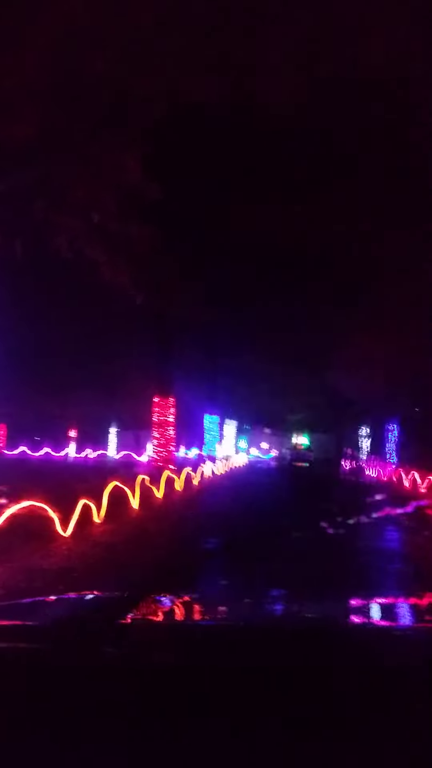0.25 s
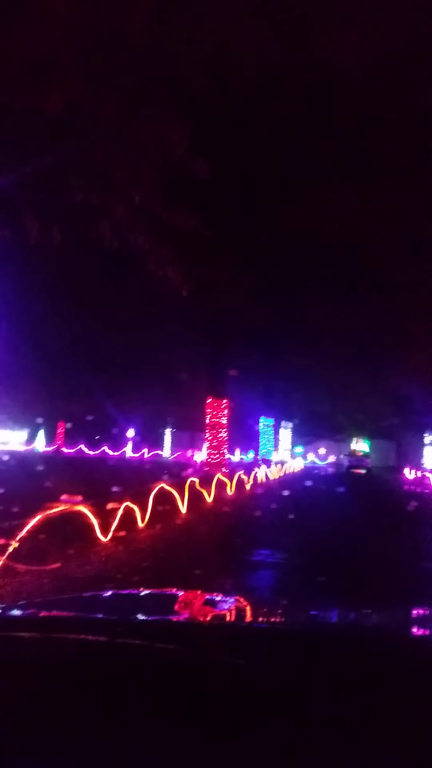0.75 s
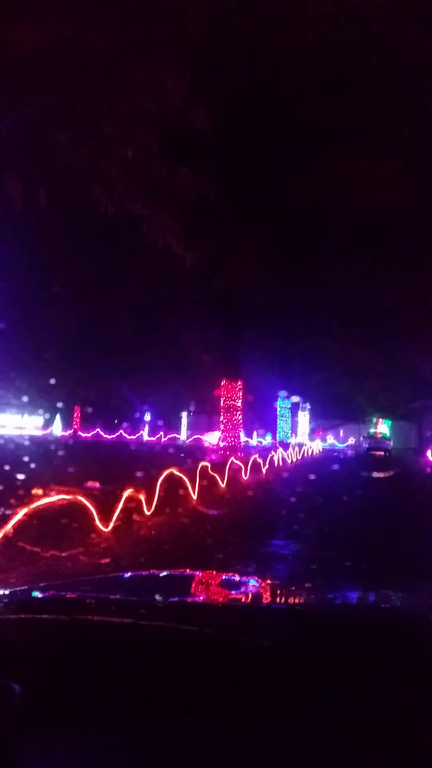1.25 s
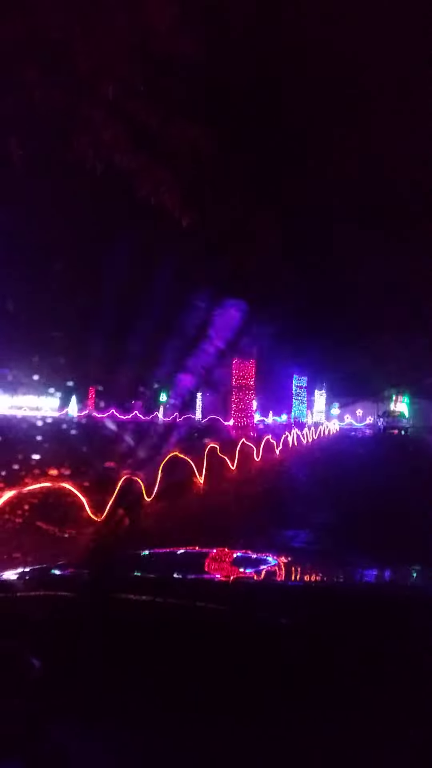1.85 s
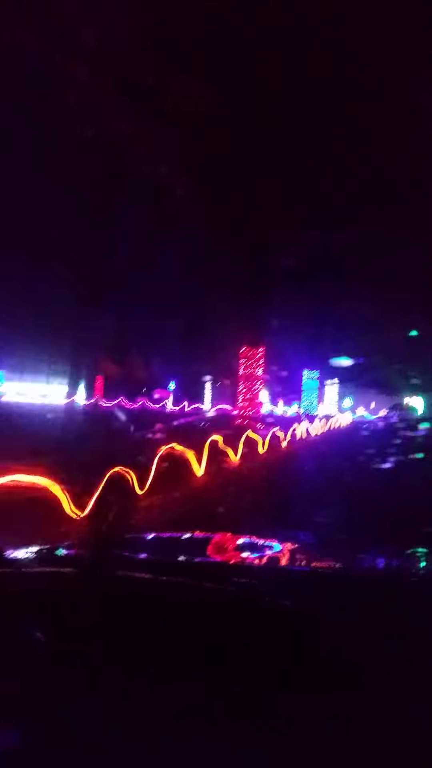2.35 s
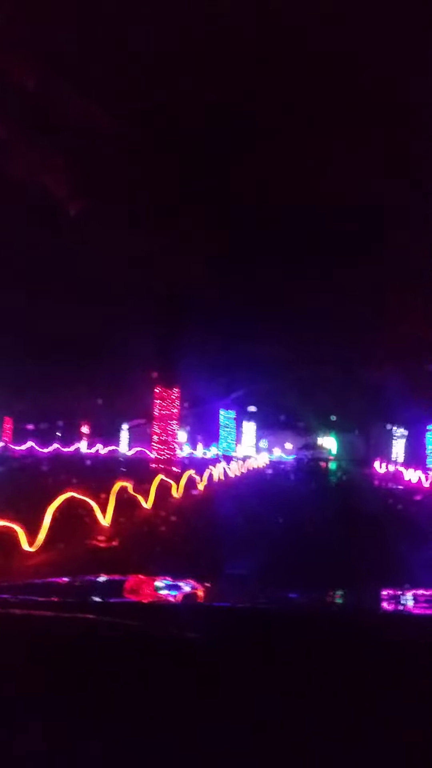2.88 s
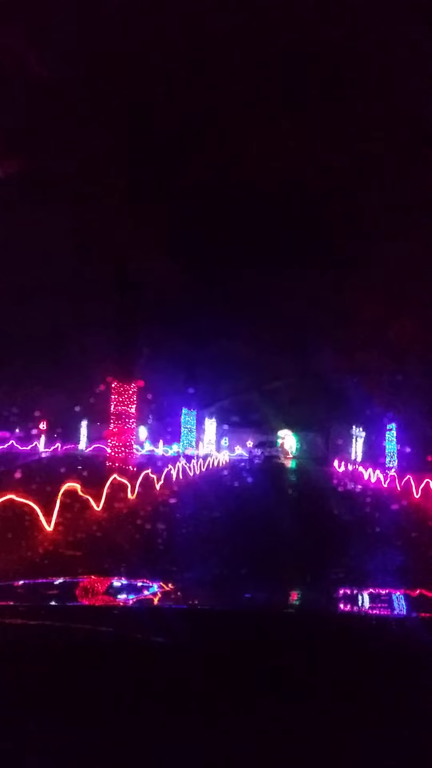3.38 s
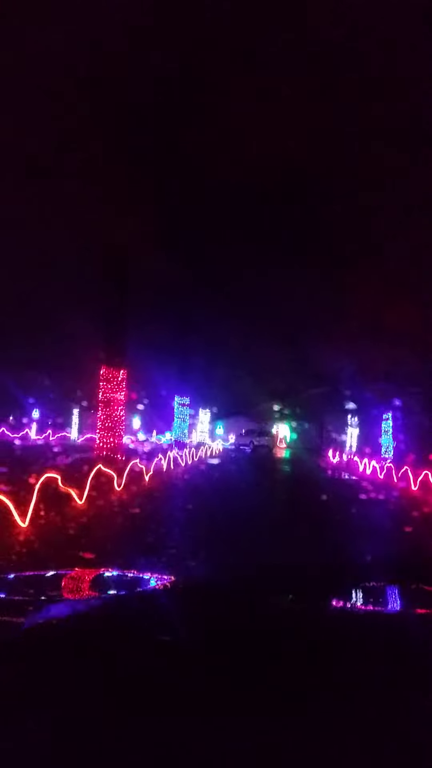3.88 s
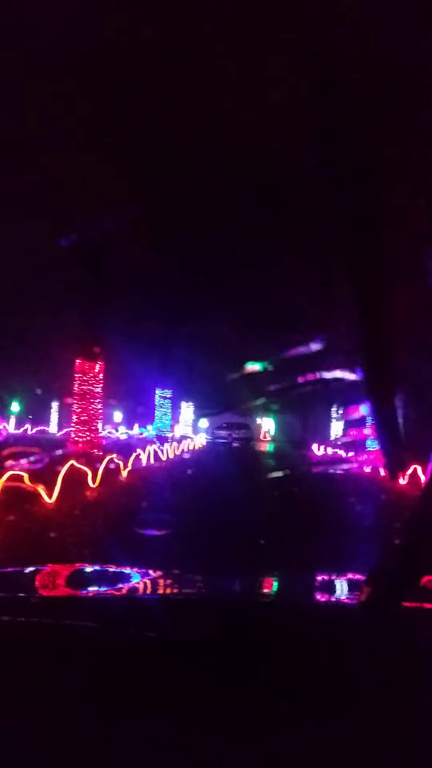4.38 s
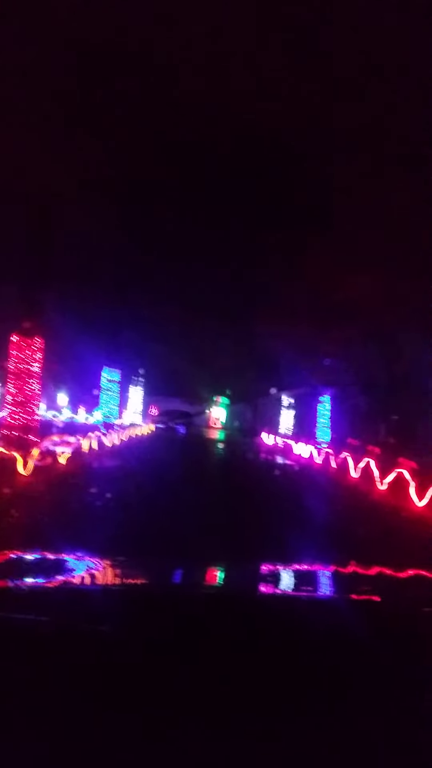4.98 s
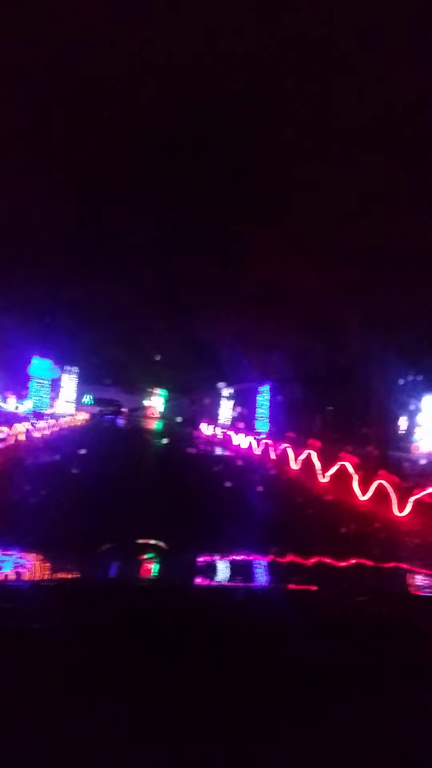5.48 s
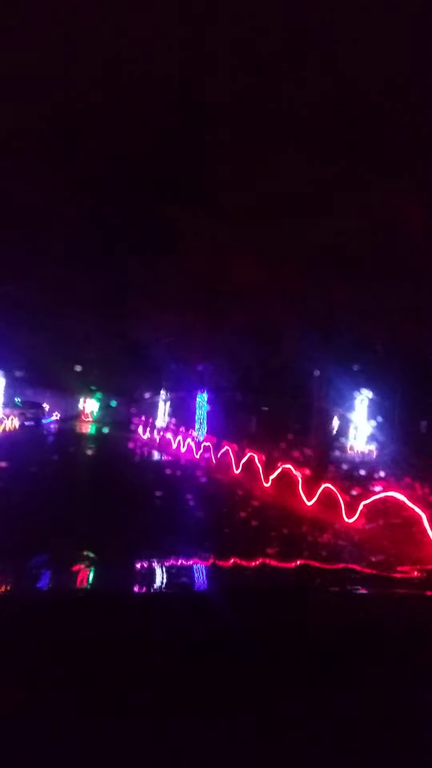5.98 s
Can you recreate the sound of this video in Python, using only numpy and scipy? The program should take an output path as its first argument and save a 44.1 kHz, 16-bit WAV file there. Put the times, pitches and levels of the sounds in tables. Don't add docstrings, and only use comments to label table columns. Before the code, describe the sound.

From the seat of a slowly moving car, dense fine rain patters while heavier drops knock overhead and splat on glass, in clusters with short gaps. Wipers thump softly around one and a half, two and four seconds, and a low road bump rolls by before four. An especially hard smack lands at about 3.4 seconds, with another near 4.6. Just after six seconds wet rubber squeaks upward. The sound is close, dry and slightly muffled on top.

```python
import sys
import numpy as np
from scipy import signal
from scipy.fft import rfft, irfft
from scipy.io import wavfile
from scipy.ndimage import uniform_filter1d

SR = 44100
rng = np.random.default_rng(int(sys.argv[2]) if len(sys.argv) > 2 else 0)


def gain_from_db(level_db):
    decades = np.asarray(level_db, float) / 20
    return 10 ** decades


def master(y):
    cut = np.clip(np.atleast_2d(y).T, -1, 1)
    pcm = np.round(cut * 32767)
    wavfile.write(sys.argv[1], SR, pcm.astype(np.int16))


N = 274743


def evened(x):
    return x / np.sqrt(np.mean(x ** 2, -1, keepdims=True) + 1e-20)


def read(points, hz):
    f, value = np.transpose(points)
    return np.interp(np.log(np.minimum(hz, 14800) + 1), np.log(f + 1), value)


def add(mix, start_s, sound):
    part = mix[max(round(start_s * SR), 0):][:len(sound)]
    part += sound[:len(part)]


def coloured(points, x):
    gain = gain_from_db(read(points, np.fft.rfftfreq(x.shape[-1], 1 / SR)))
    return evened(irfft(rfft(x) * gain, x.shape[-1]))


# pitch_hz, t60_s, rise_factor
PANEL_BANDS = [(150, 0.38, 5.5), (300, 0.22, 4.45), (487, 0.24, 1.23), (1106, 0.14, 1.35),
               (1950, 0.12, 0.81), (4100, 0.099, 0.9), (6300, 0.13, 0.19), (12100, 0.14, 0.11)]
# pitch_hz, level_db (per Hz)
PANEL_COLOUR = [(35, -66), (60, -94), (119, -22.5), (252, -1.5), (341, -4), (384, 1), (600, -8), (796, -4),
                (983, -9), (1940, -2.5), (2580, -11.5), (4750, -22), (6910, -36.5), (15000, -43),
                (16500, -89)]
# pitch_hz, level_db, t60_s
ROOF_MODES = [(436.4, -7, 0.2), (344, -18.5, 0.089), (757.4, -13.5, 0.25), (1113, -11.5, 0.14),
              (1400, -7.5, 0.074), (1780, -21, 0.046), (2225, -7, 0.1), (4906, -14.5, 0.033)]
LUMP_DB, BURST, BURST_S = 3, 0.72, .0025
DRY_DB = -8


def knocks(boom_db, splat_db, ring, rise_ms, size=4096):
    t, hz = np.arange(size) / SR, np.fft.rfftfreq(size, 1 / SR)
    boom_db, splat_db, ring, rise_ms = (np.asarray(c)[:, None] for c in (boom_db, splat_db, ring, rise_ms))
    ring = np.clip(ring, .2, 2.5)
    rise_s = np.clip(rise_ms, .05, 25) / 1000

    chance = rng.standard_normal((len(ring), size + 2 * len(ROOF_MODES)))
    dense = rfft(chance[:, :size]) * gain_from_db(read(PANEL_COLOUR, hz))
    dense /= np.sqrt(np.mean(abs(dense) ** 2) / size)
    lumps = evened(uniform_filter1d(chance[::-1, :size], size=25, axis=1))
    splash = gain_from_db(LUMP_DB * lumps) * (1 + BURST * np.exp(-t / (BURST_S + rise_s)))

    def tilt(f):
        boom = (boom_db + 0.5) * np.interp(f, [600, 1100], [1, 0])
        splat = (splat_db + 21.5) * np.interp(f, [3000, 6000], [0, 1])
        return gain_from_db(boom + splat + DRY_DB * np.interp(f, [5000, 9000], [0, 1]))

    out = np.zeros((len(ring), size))
    centres = [row[0] for row in PANEL_BANDS]
    for k, (f, t60_s, slow) in enumerate(PANEL_BANDS):
        share = read(list(zip(centres, np.arange(len(PANEL_BANDS)) == k)), hz)
        wet = splash ** np.interp(f, [1000, 12000], [.3, 1])
        swell = (1 - np.exp(-t / (rise_s * slow))) ** 1.23
        out += wet * tilt(f) * irfft(dense * share, size) * swell * gain_from_db(-60 * t / (t60_s * ring))
    for k, (f, level_db, t60_s) in enumerate(ROOF_MODES):
        reach = np.tanh(chance[:, [size + 2 * k]])
        detune = 1 + 0.017 * chance[:, [size + 2 * k + 1]]
        envelope = gain_from_db(level_db - 60 * t / (t60_s * ring)) * (1 - np.exp(-t / (rise_s * 0.24)))
        out += tilt(f) * reach * envelope * np.sin(2 * np.pi * f * detune * t)
    out *= np.clip(4 - 4 * np.arange(size) / size, 0, 1)
    mid = signal.sosfilt(signal.butter(2, [900, 4000], "band", fs=SR, output="sos"), out)
    return out / abs(mid).max(1, keepdims=True)


PATTER_PER_S = 220


def patter(count=60):
    boom, splat, ring, rise = rng.standard_normal((count, 4)).T
    shapes = knocks(-5 + 2 * boom, -16 + 3 * splat, .5 + .12 * ring, .8 * np.exp(.8 * rise))
    out = np.zeros(N)
    for at, spot, size in rng.random((1500, 3))[:int(PATTER_PER_S * N / SR)]:
        level_db = -2.6 * np.log(1 - .97 * size)
        add(out, at * N / SR, gain_from_db(level_db) * shapes[int(spot * count)])
    return evened(out)


# pitch_hz, level_db (per Hz)
WASH_COLOUR = [(18, -73), (30, -45), (255, 8), (432, 3), (592, -1.5), (813, 2), (978, -5.5), (2000, -3.5),
               (3380, -18), (4900, -23.5), (6900, -46), (14800, -28), (16500, -104)]
# start_s, level_db
RAIN_LEVEL = [
    (0.0, -38.5),
    (1.32, -42.5),
    (1.54, -38.5),
    (3.5, -47.5),
    (3.57, -46.5),
    (4.94, -40.5),
    (5.24, -46),
    (6.23, -39.5),
]
PATTER_DB = -1


def rain():
    frames, hz = N // 128 + 5, np.fft.rfftfreq(512, 1 / SR)
    a, b, patches = rng.standard_normal((frames, 257, 3)).T
    patches = uniform_filter1d(patches, size=8, axis=0)
    patches = evened(uniform_filter1d(patches, size=10, axis=1))
    flicker = evened(uniform_filter1d(rng.standard_normal(frames), size=5))
    patch_db = 4.54 * patches * np.interp(hz, [400, 1000], [.6, 1])[:, None]
    flicker_db = 3.3 * flicker * np.interp(hz, [400, 1000, 5000, 7500], [.65, 0.93, 1, .3])[:, None]
    z = (a + 1j * b) * gain_from_db(patch_db + flicker_db)
    wash = coloured(WASH_COLOUR, signal.istft(z, nperseg=512, noverlap=384)[1][:N])
    start_s, level_db = np.transpose(RAIN_LEVEL)
    swell = gain_from_db(np.interp(np.arange(N) / SR, start_s, level_db) - 6.0)
    return swell * (wash + gain_from_db(PATTER_DB) * patter())


# start_s, level_db, pitch_hz, t60_s
BUMPS = [
    (.002, -57, 106, 0.14),
    (2.03, -60, 120, .15),
    (2.4, -62, 99, 0.18),
    (2.785, -53, 121, 0.13),
    (3.72, -48, 105, .5),
    (3.851, -59, 95, .3),
    (4.321, -55, 130, 0.18),
    (5.01, -62, 111, .15),
]
# start_s, level_db, pitch_hz, t60_s
PANEL_PINGS = [(.055, -28, 700, .09), (3.93, -42, 4750, .06), (3.841, -48, 4750, .06),
               (3.709, -49, 4750, .05), (1.408, -39, 660, .12), (1.456, -34, 750, .12),
               (2.126, -35, 420, .07), (2.555, -41, 3350, .035), (3.228, -50, 3500, .04),
               (3.655, -38, 410, .14), (5.399, -39, 1600, .07), (5.863, -36, 420, .1),
               (5.954, -34, 420, .1)]
# start_s, level_db, pitch_hz, t60_s
WIPER_THUMPS = [(1.535, -33, 228.6, 0.24), (1.54, -38.5, 388, 0.25), (1.63, -41, 206, 0.54),
                (1.7, -44.5, 150, 0.24), (1.962, -25, 256, 0.03), (2.188, -34, 197, 0.081),
                (3.718, -44, 134, 0.42), (3.74, -37.5, 257, 0.27), (3.765, -36.5, 381, 0.28),
                (4.169, -34, 218, 0.1), (4.422, -31.5, 235, 0.069), (5.916, -45.5, 126, 0.79),
                (5.94, -43.5, 236.5, 0.32), (6.129, -50, 111, .4), (6.199, -58, 197, 0.55)]


def thumps():
    out, t = np.zeros(N), np.arange(SR // 2) / SR
    rows = WIPER_THUMPS + PANEL_PINGS + BUMPS
    for (start_s, level_db, hz, t60_s), noise in zip(rows, rng.standard_normal((len(rows), len(t)))):
        wobble = evened(uniform_filter1d(noise, size=500))
        ring = (1 + .4 * wobble) * np.sin(2 * np.pi * hz * t + .7 * wobble)
        onset = 1 - np.exp(-t * hz / 0.46)
        add(out, start_s, gain_from_db(level_db + 4.0 - 60 * t / t60_s) * onset * ring)
    return out


# start_s, level_db (peak)
TICKS_MIDDLE = [(.0548, -22), (.4861, -25), (.5519, -13.5), (.5893, -23), (.759, -31), (.8229, -15),
                (.9868, -19), (.4395, -28), (.3165, -20), (.9305, -22), (.8624, -25), (1.892, -22),
                (2.2872, -26.5), (2.4896, -22), (2.6418, -36), (2.828, -30), (2.8948, -16.5),
                (3.1871, -26.5), (3.4091, -18), (3.46, -31), (3.7336, -25), (3.7611, -23), (4.6005, -22),
                (4.3985, -29), (4.4293, -16), (4.662, -20), (4.7781, -21), (4.9673, -12), (5.3991, -20),
                (5.4355, -21.5), (5.5846, -28.5), (6.1051, -12)]
# start_s, level_db (peak)
TICKS_SIDE = [(.0894, -29), (.2834, -27.5), (.9892, -40), (1.441, -30), (1.6326, -22), (1.8555, -35),
              (4.1385, -25), (4.4697, -33), (4.8408, -38), (6.0193, -29), (6.142, -29), (6.169, -43),
              (1.829, -38), (4.677, -33), (6.006, -35), (6.03, -40), (.67, -31), (2.752, -40), (4.116, -34),
              (2.733, -39), (4.0667, -42), (4.1711, -36)]
# start_s, level_db (peak)
TICKS_RIM = [(.1583, -17), (.5009, -23.5), (.5807, -25), (1.0044, -35), (1.458, -23), (1.5584, -26),
             (2.0602, -37), (2.9414, -19.5), (3.4966, -28), (3.8401, -36), (3.9284, -21), (4.0894, -17),
             (4.5135, -21), (4.6284, -20.5), (4.7914, -32), (4.9154, -22.5), (5.2696, -33), (5.2861, -28.5),
             (5.5542, -34), (5.6398, -20.5), (5.24, -28), (5.32, -39), (5.979, -30), (1.167, -33.5),
             (1.545, -32), (5.901, -37), (5.806, -31), (3.187, -33)]
MIDDLE_HZ, SIDE_HZ, RIM_HZ = 1760, 3700, 4520
MIDDLE_SNAP, SIDE_SNAP, RIM_SNAP, STRAY_SNAP = 0.5, 1, 0.67, 0.59
STRAY_PER_S, STRAY_DB = 140, -46.5


def ticks():
    spots = [(TICKS_MIDDLE, MIDDLE_HZ, MIDDLE_SNAP), (TICKS_SIDE, SIDE_HZ, SIDE_SNAP),
             (TICKS_RIM, RIM_HZ, RIM_SNAP)]
    rows = [(start_s, level_db, hz, snap) for table, hz, snap in spots for start_s, level_db in table]
    for at, size, pitch in rng.random((900, 3))[:int(STRAY_PER_S * N / SR)]:
        stray_db = STRAY_DB - 1.2 * np.log(1 - .97 * size)
        rows.append((at * N / SR, stray_db, 1600 + 4200 * pitch, STRAY_SNAP))

    t, out = np.arange(700) / SR, np.zeros(N)
    for (start_s, level_db, hz, snap), noise in zip(rows, rng.standard_normal((1000, len(t)))):
        click = np.sin(2 * np.pi * hz * t) * gain_from_db(-10 * hz * t) * (1 - np.exp(-t * hz * 5))
        click[2:4] += 0.14 * snap, -.3 * snap
        fade = gain_from_db(-60 * t / 0.052) * (1 - t / t[-1])
        reflections = uniform_filter1d(noise, size=4) * 0.24 * snap * fade
        add(out, start_s, gain_from_db(level_db + 2.5) * np.convolve(click + reflections, [.3, .6, .3]))
    return out


# start_s, level_db (peak)
SPRAY_BURSTS = [(0.0318, -47), (0.156, -31), (0.2079, -49), (0.3157, -40), (0.3586, -45), (0.4389, -46),
                (0.4783, -50), (0.4998, -45), (0.5272, -50), (0.5496, -32), (0.5881, -56), (0.5881, -45),
                (0.6235, -45), (0.6953, -51), (0.7642, -35), (0.822, -55), (0.8614, -55), (0.8804, -48),
                (0.93, -35), (0.9697, -54), (0.9862, -43), (1.1648, -50), (1.2176, -52), (1.4037, -46),
                (1.4042, -41), (1.4401, -51), (1.4551, -37), (1.5414, -52), (1.5574, -43), (1.5973, -52),
                (1.6307, -50), (1.7439, -42), (1.8282, -51), (1.891, -40), (1.953, -43), (2.0133, -48),
                (2.0582, -33), (2.0832, -36), (2.1016, -30.5), (2.177, -45), (2.2174, -45), (2.2857, -49),
                (2.4872, -33), (2.5545, -33.5), (2.602, -46), (2.6988, -40), (2.7985, -47), (2.8265, -49),
                (2.8454, -48), (2.8804, -46), (2.8943, -40), (2.9402, -36),
                (3.1417, -51), (3.1856, -49), (3.2086, -54), (3.2211, -49), (3.2844, -53), (3.3617, -30),
             (3.4076, -40), (3.4575, -47), (3.4964, -36), (3.6571, -49), (3.7055, -36), (3.7324, -47),
             (3.8257, -51), (3.8392, -44), (3.9274, -34), (3.9664, -51), (4.0856, -38), (4.1115, -41),
                (4.1373, -41), (4.1787, -50), (4.3493, -56), (4.3977, -53), (4.4285, -35), (4.4691, -44),
              (4.5115, -45), (4.512, -39), (4.5988, -44), (4.6277, -44), (4.6462, -52), (4.6611, -44),
              (4.6846, -42), (4.7015, -42), (4.7379, -46), (4.7769, -49), (4.8008, -47), (4.8397, -47),
              (4.8811, -47), (4.9145, -43), (4.9689, -43), (5.0088, -50), (5.0547, -47), (5.1086, -50),
              (5.136, -42), (5.2667, -48), (5.3984, -43), (5.4344, -43), (5.4678, -43), (5.5022, -40),
              (5.5835, -50), (5.6389, -40), (5.7347, -41), (5.7731, -47), (5.8604, -52), (5.9183, -38),
              (6.0579, -45),
                (1.035, -49),
    (2.33, -50),
    (2.731, -50),
    (3.511, -39),
    (3.67, -46),
    (4.112, -42),
    (4.126, -46),
    (4.72, -45),
    (4.751, -51),
    (6.2135, -40),
]
SPRAY_HZ, SPRAY_DB, SPRAY_T60_S = 5200, -5, 0.048


def spray():
    start_s, level_db = np.transpose(SPRAY_BURSTS)
    t, out = np.arange(1500) / SR, np.zeros(N)
    noise = rng.standard_normal((len(start_s), 2, len(t)))
    highpass = signal.butter(3, SPRAY_HZ, "high", fs=SR, output="sos")
    hiss = evened(signal.sosfilt(highpass, noise[:, 0]))
    lumps = evened(uniform_filter1d(noise[:, 1], size=30))
    crack = 1 + 1.96 * np.exp(-t / .0009)
    shape = crack * (1 - np.exp(-t / 0.00019)) * (1 - t / t[-1])
    gain = gain_from_db(level_db[:, None] + SPRAY_DB - 6.5 + 3.8 * lumps - 60 * t / SPRAY_T60_S)
    for at, burst in zip(start_s, gain * shape * hiss):
        add(out, at, burst)
    return out


# start_s, level_db (peak), ring_factor, boom_db
ON_SIDE = [
    (.0313, -35, 0.77, -6),
    (.2803, -42, 0.45, -1.1),
    (.4375, -35, .47, -5),
    (2.5535, -27.5, 0.47, -0.5),
    (4.6835, -24, 0.26, -3),
    (4.9243, -29.5, 0.46, -5.5),
    (5.434, -30.5, 0.17, 5.5),
    (5.488, -29, 0.2, -9),
    (5.5018, -24.5, 0.74, -12),
]
# start_s, level_db (peak), ring_factor, boom_db
ON_ROOF = [(.0525, -28.5, 0.32, 5.5), (.3098, -20.5, 0.69, -7), (.8215, -25, 0.46, 1.5),
           (.9285, -21.5, 0.62, -6), (1.4551, -20, 1.2, -5.5), (1.6307, -20, 1.05, 1),
           (1.7132, -29, 1.2, -6), (2.1015, -16, 0.73, -3), (2.2855, -37, 0.24, 5.5),
           (2.314, -33.5, 1.7, -2.1), (2.6396, -24.5, 0.31, 2.5), (2.8928, -20, 0.3, -2),
           (3.6038, -31, 1.6, -1.5), (3.6228, -27, 0.44, -1.5), (3.7311, -24, 0.91, -2),
           (3.7596, -31.5, 0.2, -3.5), (3.8248, -30, 0.56, 6), (3.9643, -26, 1.65, -4),
           (4.5975, -15.5, 0.85, 2), (4.7001, -20.5, 0.39, -8.5), (4.776, -28.5, 0.2, -15),
           (4.8314, -29.5, .24, -11), (4.8813, -22, 0.46, -3.5), (4.913, -27.5, 0.65, -6),
           (4.965, -23, 0.31, -8), (5.0547, -22, 0.47, -5), (5.7347, -21, .8, -6.5),
           (6.1508, -28.5, 0.3, -3)]
# start_s, level_db (peak), ring_factor, boom_db
ON_GLASS = [(.113, -33, 0.39, -16), (.1553, -20, .28, -12), (.5478, -22.5, 0.63, -2), (.6233, -30, 2, -5),
            (.7636, -22.5, 0.9, -3.5), (.861, -25.5, 0.37, -3), (.9852, -28.5, 0.44, -6),
            (1.4029, -24, 1.3, -5.5), (1.5553, -33, .75, 1.5), (1.889, -25, 0.33, -2),
            (2.0117, -30, 0.32, -14), (2.4874, -21, 1.07, -4.5), (2.9389, -21, 1.1, -3.5),
            (3.3623, -13, 0.75, -2.5), (3.4069, -21, 0.79, -2.5), (3.457, -30, 0.61, 0),
            (3.8387, -25.5, 1.14, -2), (4.1351, -24, 0.29, -0.5), (4.3987, -31, 0.16, 3.5),
            (4.4279, -22.5, 0.34, 0), (4.4676, -25, 0.43, -4.5), (4.6593, -29.5, 1.3, -11),
            (5.3976, -23.5, 0.33, -4), (5.638, -30.5, 0.45, 2), (5.9179, -18, 1.14, 0.5),
            (6.0737, -30, 2.9, -3), (6.1039, -20, 0.37, -9)]
# start_s, level_db (peak), ring_factor, boom_db
ON_FILM = [(.1909, -32, 1.4, -1), (.356, -27.5, 0.61, -6), (1.7444, -22, 0.41, -8.5),
           (1.9478, -28, 2.1, 2.5), (2.0578, -22.5, 0.74, -4), (2.0836, -16.5, 0.44, -11.5),
           (2.6024, -29.5, 0.45, -2.5), (2.8422, -30.5, 0.51, -9), (3.219, -31, 0.67, -2),
           (3.4955, -20.5, 0.54, -7), (3.7034, -24.5, 0.7, -1.5), (3.9272, -19.5, 0.57, -1.3),
           (4.0836, -22, 1.5, -3.5), (4.511, -22, 0.54, -4), (4.8008, -29, 0.66, -7),
           (5.4084, -27, 0.4, -5.5), (5.4675, -19.5, 0.65, -7.5), (5.654, -31, 0.27, -9),
           (6.2158, -17.5, 0.5, -1.5)]
# start_s, level_db (peak), ring_factor, boom_db
ON_REAR = [(.4788, -34, 0.55, -7), (.8815, -26.5, 0.81, -3.5), (1.0022, -30, 0.86, -4.5),
           (1.678, -29, 1.3, -13), (2.0322, -28.5, 0.35, -5), (2.1713, -21.5, 0.8, -3),
           (2.2158, -25.5, 1.04, -3), (2.6994, -24, 0.63, -5.5), (3.0943, -37, 0.76, -16),
           (3.1406, -26.5, 0.58, -3), (3.2832, -34.5, 0.88, -1.5), (3.655, -26.5, 0.76, 0),
           (4.1678, -30, 3.1, 4), (4.4986, -28.5, 0.75, 4), (5.0047, -26.5, 1.1, -0.5),
           (5.107, -30.5, 0.63, -20), (5.135, -20, 0.74, -3)]
# start_s, level_db (peak)
FAR_DROPS = [(1.143, -31.5), (1.216, -35.5), (1.31, -35), (2.876, -31.5), (3.022, -36), (5.222, -33.5),
             (4.352, -36), (5.806, -34.5), (2.797, -36.5), (.694, -40), (1.11, -33), (3.6, -37)]
REACH_S = .0012


def drops():
    places = [(ON_GLASS, -14.5, 1.04), (ON_ROOF, -18, 1.34), (ON_FILM, -16.5, 4.7),
              (ON_REAR, -19.5, 3.5), (ON_SIDE, -8.5, 1.7)]
    rows = []
    for table, splat_db, rise_ms in places:
        for start_s, level_db, ring, boom_db in table:
            rows.append((start_s, level_db, boom_db, splat_db, ring, rise_ms))
    for start_s, level_db in FAR_DROPS:
        rows.append((start_s, level_db, -6, -17, 1.1, 4.5))
    starts_s, levels_db, *colour = np.transpose(rows)
    out = np.zeros(N)
    for at, level_db, knock in zip(starts_s, levels_db, knocks(*colour)):
        add(out, at + REACH_S, gain_from_db(level_db - 0.5) * knock)
    return out


# start_s, level_db (peak), ring_factor
SMALL_DROPS = [(.176, -30, .35), (.209, -29, .4), (.3162, -17.5, 0.33), (.543, -26, 0.37),
               (0.7583, -29, .25), (.8035, -28, .3), (.974, -29, 0.36), (1.03, -32, .35), (1.288, -33, .38),
               (1.335, -35, .35), (1.543, -32, .35), (1.5974, -33, .35), (1.6604, -30, 0.32),
               (1.907, -34, 0.32), (1.9653, -25, .3), (1.993, -29, .35), (2.0674, -17.5, .3),
               (2.1784, -21, .4), (2.33, -36, 0.32), (2.682, -31, .3), (2.731, -31.5, 0.27),
               (2.8514, -27, .4), (3.05, -36, .35), (3.2892, -30, 0.52), (3.5105, -26, .3),
               (4.0655, -29.5, .25), (4.179, -26.5, 0.37), (4.2644, -36, .35), (4.226, -32.5, 0.41),
               (4.5257, -22, 0.49), (4.647, -27, .3), (4.738, -29, 0.43), (4.75, -32, .3),
               (4.811, -28, .35), (5.014, -27, 0.36), (5.1442, -21.5, .4), (5.2665, -33, 0.25),
               (5.335, -34.5, .4), (5.5836, -39, .35), (5.615, -35, .35), (5.69, -33, 0.58),
               (5.773, -33, .3), (5.9954, -37, .35), (6.198, -31, .35)]


def small_drops():
    starts_s, levels_db, ring = np.transpose(SMALL_DROPS)
    same = np.ones(len(ring))
    shapes = knocks(-8 * same, -16 * same, ring, 0.79 * same, size=1536)
    out = np.zeros(N)
    for at, level_db, knock in zip(starts_s, levels_db, shapes):
        add(out, at, gain_from_db(level_db - 3.5) * knock)
    return out


# pitch_hz, level_db (per Hz)
BLADE_COLOUR = [(470, -41), (800, -4), (2560, -9), (3700, -3.5), (4590, -5), (8000, -17.5), (10500, -17.5),
                (13800, -24.5), (15900, -34), (16500, -56)]
# start_s, hiss_db, squeal_hz, squeal_db (over the hiss)
SQUEAL = [
    (6.028, -65, 1400, -9),
    (6.061, -43, 1487, 4),
    (6.09, -38, 2290, -4),
    (6.111, -34.5, 3263, 2),
    (6.123, -36, 4560, 0),
    (6.137, -39, 5270, -1),
    (6.149, -47, 5400, -8),
    (6.174, -71, 5200, -10),
]


def squeal():
    start_s, *columns = np.transpose(SQUEAL)
    t = np.arange(start_s[0], start_s[-1], 1 / SR)
    hiss_db, hz, whistle_db = (np.interp(t, start_s, c) for c in columns)
    turn = 2 * np.pi * np.cumsum(hz) / SR
    arm = 2 * np.pi * 4650 * t
    sound = coloured(BLADE_COLOUR, rng.standard_normal(len(t)))
    voices = [(turn, whistle_db, 45), (1.7 * turn, whistle_db - 13, 30), (arm, -10, 50)]
    for phase, level_db, size in voices:
        fuzz = uniform_filter1d(rng.standard_normal((2, len(t))), size=size)
        fuzz = uniform_filter1d(fuzz, size=size)
        sound = sound + gain_from_db(level_db) * evened(fuzz[0] * np.cos(phase) + fuzz[1] * np.sin(phase))
    stutter = evened(uniform_filter1d(rng.standard_normal(len(t)), size=60))
    out = np.zeros(N)
    add(out, start_s[0], gain_from_db(hiss_db + 2.2 * stutter) * sound)
    return out


def scene():
    mix = rain() + thumps() + ticks() + spray() + drops() + small_drops() + squeal()
    return mix[None]


# start_s, dip_hz (centre)
HAND_SHADE = [
    (0, 7300),
    (1.8, 6430),
    (2.4, 6250),
    (2.7, 7600),
    (4.0, 8200),
    (5.5, 8140),
    (6.23, 8100),
]
SHADE_DB, SHADE_WIDE_HZ, DULL_DB = -2.5, 810, -5.5


def shaded(x):
    hz, t, z = signal.stft(x, SR, nperseg=256)
    centre_hz = np.interp(t, *np.transpose(HAND_SHADE))
    dip = np.exp(-((hz[:, None] - centre_hz) / SHADE_WIDE_HZ) ** 2)
    dull_db = DULL_DB * np.interp(hz, [13000, 16000], [0, 1])[:, None]
    return signal.istft(z * gain_from_db(SHADE_DB * dip + dull_db), SR, nperseg=256)[1][:, :N]


def gain_controlled(x):
    power_db = 10 * np.log10(abs(uniform_filter1d(x[0] ** 2, size=300)) + 1e-12)
    fall_db = np.arange(N) * 76.0 / SR
    held_db = np.maximum.accumulate(power_db + fall_db) - fall_db
    over_db = np.maximum(held_db + 40.5, 0)
    return x / gain_from_db(0.21 * uniform_filter1d(over_db, size=200))


def low_pass(x):
    return signal.sosfilt(signal.butter(12, 16640, fs=SR, output="sos"), x)


HISS_DB, RUMBLE_DB = -66.5, -89.5
EDGE_HZ = 15790


def record(dry):
    x = signal.sosfilt(signal.butter(6, 98, "high", fs=SR, output="sos"), dry)
    x = x + gain_from_db(HISS_DB) * evened(np.diff(rng.standard_normal(N + 1)))
    x = gain_controlled(shaded(x))
    x = x + gain_from_db(RUMBLE_DB) * evened(uniform_filter1d(rng.standard_normal(N), size=200))
    edge = signal.firwin2(2047, [0, EDGE_HZ - 30, EDGE_HZ + 30, 16600, 16700, SR / 2],
                          [1, 1, .006, .004, 0, 0], fs=SR)
    x = signal.oaconvolve(x, edge[None], "same")
    return low_pass(x)


dry = scene()
out = record(dry)
master(out)
```